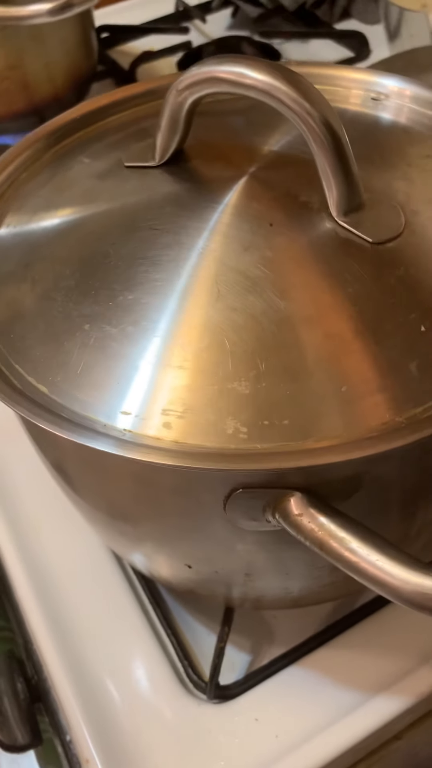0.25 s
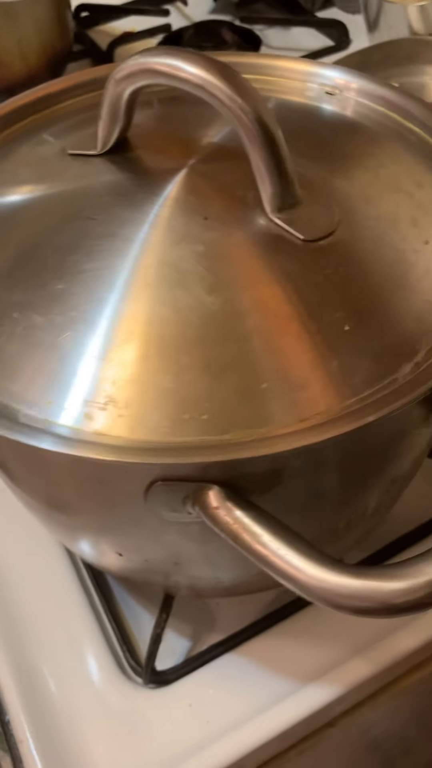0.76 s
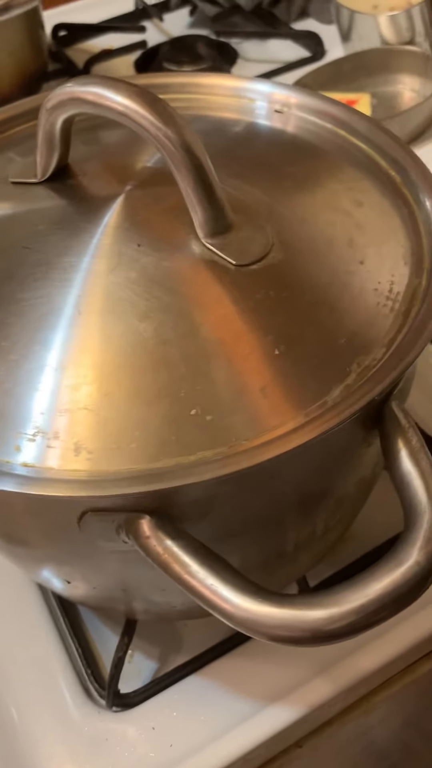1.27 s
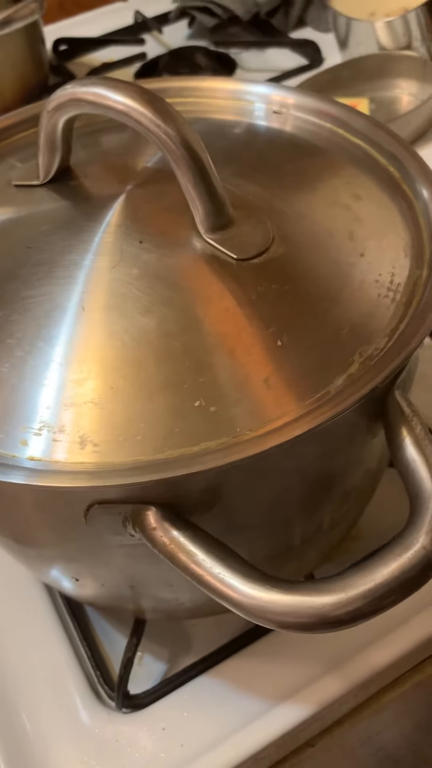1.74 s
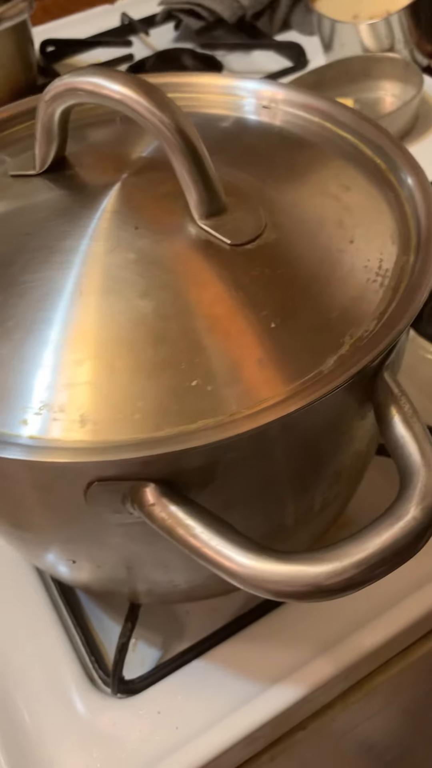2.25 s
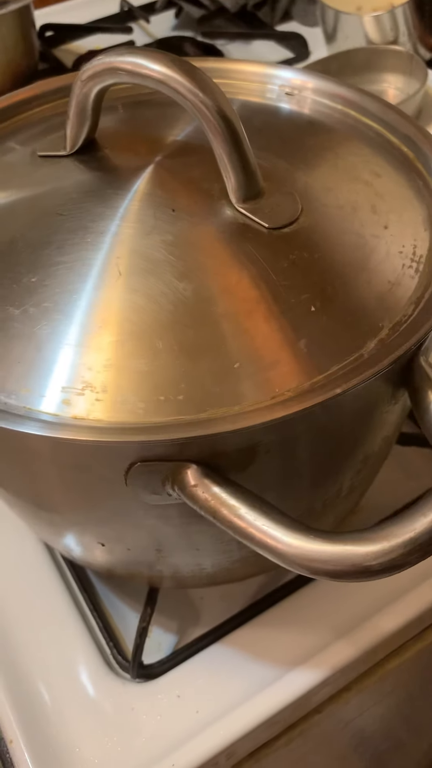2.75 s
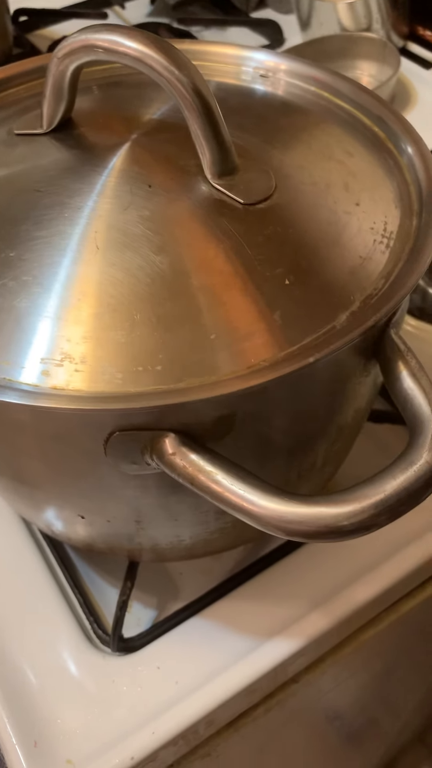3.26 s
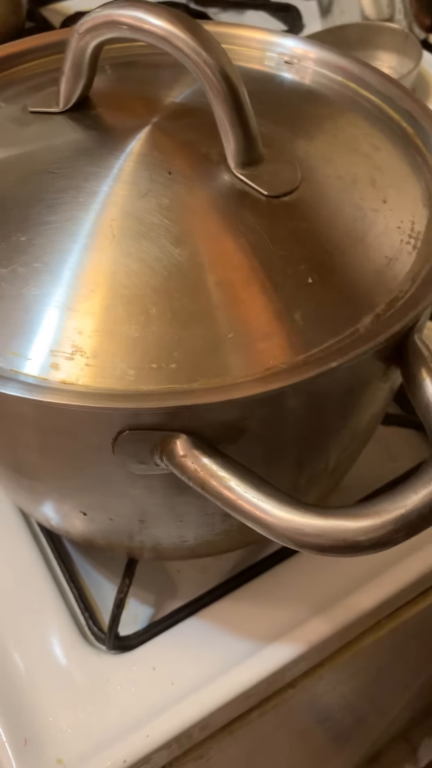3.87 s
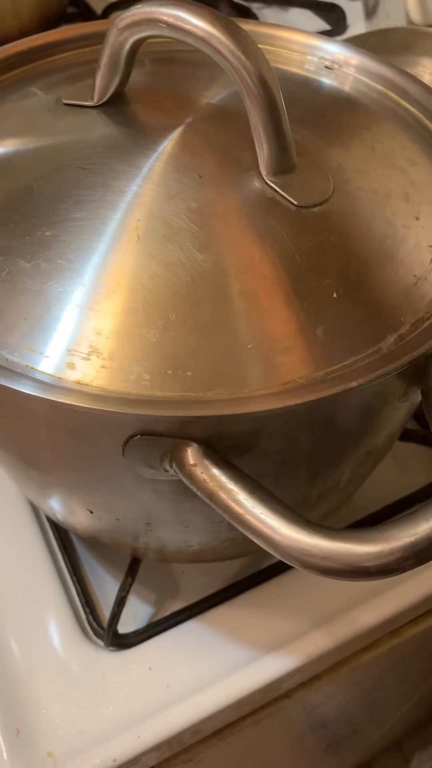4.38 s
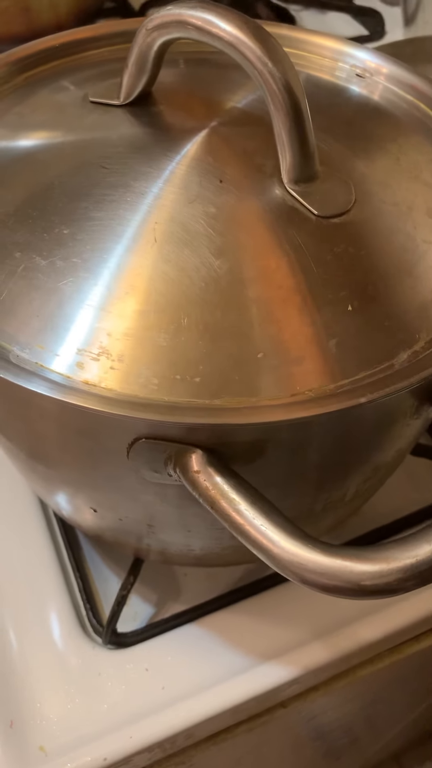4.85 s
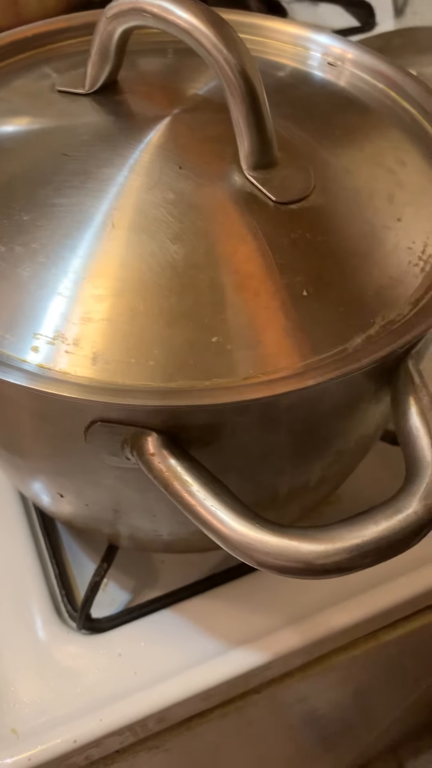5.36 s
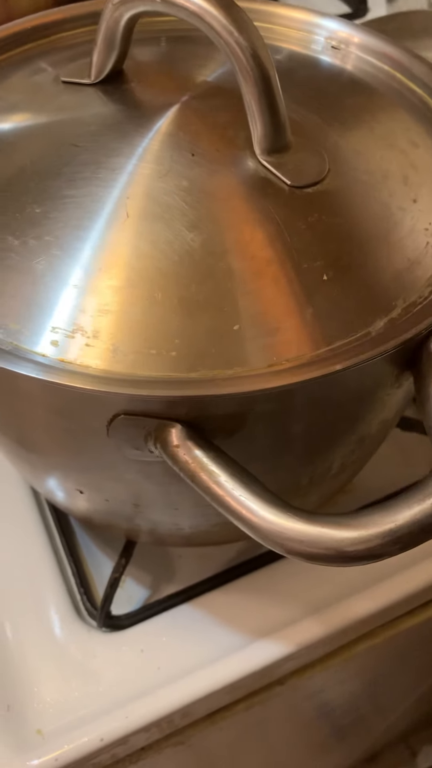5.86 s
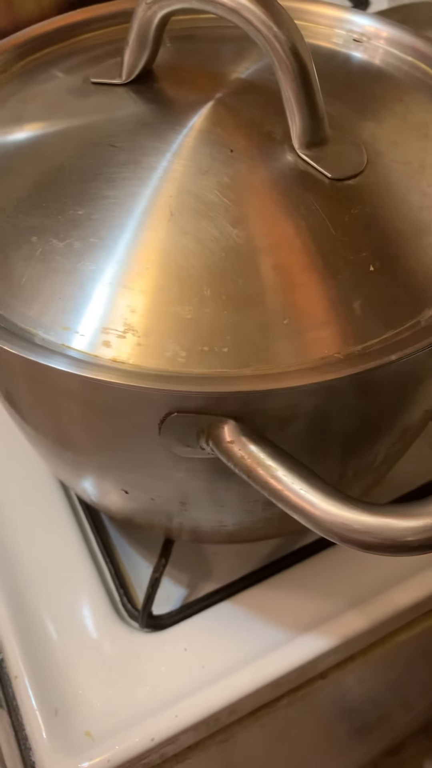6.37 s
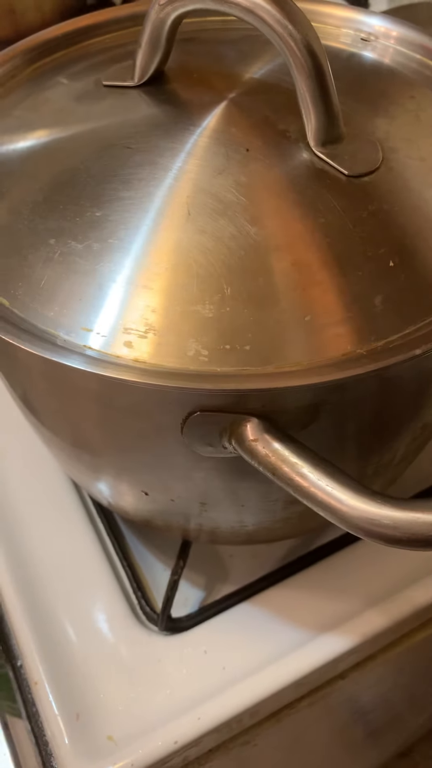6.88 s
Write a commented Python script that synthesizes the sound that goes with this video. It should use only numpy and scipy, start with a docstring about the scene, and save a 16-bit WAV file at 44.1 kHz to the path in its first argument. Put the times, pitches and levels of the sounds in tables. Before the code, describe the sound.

Steady gas hiss and fine bubbling fizz over a low fan hum, with a weighty set-down near the start and a sharp cookware clank later.

```python
"""A covered steel stockpot boils on a gas burner in a small kitchen, heard from just above the lid.
Throughout, banded noise makes the flame hiss, tiny decaying sines fizz as bubbles and a fan hums.
A load shifts with soft noise rumbles; something heavy is then set down with a few dull thuds, and a
utensil knocks lightly. Late on, a piece of cookware clanks over a short low boom of the hob panel.
Struck things are bursts of noise for their crowded modes, with decaying sines for the clear ones."""
import sys
import numpy as np
from scipy import signal
from scipy.fft import rfft, irfft
from scipy.io import wavfile

SR = 44100
rng = np.random.default_rng(int(sys.argv[2]) if len(sys.argv) > 2 else 0)


def file_out(sig):
    """Save sig as 16-bit WAV at sys.argv[1]."""
    # one column per channel
    cols = np.atleast_2d(sig).T
    # limit, then scale
    lim = np.clip(cols, -1, 1)
    pcm = np.round(lim * 32767).astype(np.int16)
    wavfile.write(sys.argv[1], SR, pcm)


N = 313992
TIME = np.arange(N) / SR  # s
FREQ = np.maximum(np.arange(N // 2 + 1) * SR / N, 1)  # Hz, kept above 0 for logarithms

# burner hiss: (frequency [Hz], density [dB per Hz])
HISS_SPECTRUM = [(150, -113), (500, -91.5), (1000, -80.3), (1800, -80.8), (2900, -79.8), (4200, -80.3),
                 (5700, -82), (6700, -84), (7500, -83), (8400, -81.5), (9900, -83), (11200, -87),
                 (12500, -88), (13800, -90.3), (15500, -90.5)]
# slow course of the hiss that flame and boil share; only its swing counts: (time [s], level [dB])
HISS_LEVEL_COURSE = [(0.0, -46.5), (2.2, -47), (3.05, -48), (3.88, -47.5), (5.25, -46.5), (5.73, -48),
                     (6.2, -46.5), (7.12, -46.5)]
# reflections off the hob and the wall behind it: (delay [ms], level [dB])
HOB_BOUNCES = [(1.7, -16.5), (3.4, -16), (5.6, -8.5), (8.3, -18.5)]

# air rushing through the fan: (frequency [Hz], density [dB per Hz])
FAN_AIR_SPECTRUM = [(22, -98), (33, -80), (45, -72), (65, -76), (92, -71.5), (125, -66.5), (165, -81.5),
                    (240, -73), (330, -81), (480, -85), (650, -99), (1000, -83.5), (3000, -105)]
# duct resonances rung by the air: (frequency [Hz], width [Hz], peak density [dB per Hz])
DUCT_RESONANCES = [(402.3, 17, -65.5), (543.8, 9.8, -69.5), (688.4, 21.5, -73), (816, 19.3, -71.5)]
# tones of the three-bladed fan: (multiple of the shaft rate, level [dB])
FAN_TONES = [(2, -78), (3, -53.5), (6, -57.5), (12, -57)]

# soft shifts of the load: (time [s], length [s], level before colouring [dB])
LOAD_SHIFTS = [(0.567, 0.051, -67), (1.163, 0.092, -69), (4.852, 0.087, -63.5)]
# colour of their rumble: (frequency [Hz], gain [dB])
LOAD_SHIFT_COLOUR = [(60, -20), (130, -3), (240, 6), (340, -1.5), (500, -14), (1500, -45)]

# heavy thing set down: (time [s], level [dB], contact [ms])
THUD_BLOWS = [(0.8586, 0.5, 0.031), (.8865, -15, .41), (0.9229, -9.5, 0.15), (0.9506, -13.5, 0.67),
              (1.0843, -4.5, 0.81)]
# broad tones of the flexing worktop: (frequency [Hz], level [dB], rise before contact slows it [ms])
WORKTOP_TONES = [(185, -25.5, 30), (229, -15.3, 21.7), (273, -7.5, 9.7), (348, -15.5, 16),
                 (409.7, -20.5, 25), (540, -20, 11.3), (660, -29, 8)]
# ring of a pan on the worktop: (frequency [Hz], level [dB], t60 [s])
PAN_RING = [(856, -23.5, 0.65), (1555, -34, 0.34), (1640, -42, .2), (1760, -42, .15)]
# colour of the thuds' crowd of short-lived modes: (frequency [Hz], relative level [dB])
THUD_COLOUR = [(100, -2), (165, 5), (240, -5), (380, 14), (650, 9), (1100, -6.5), (1700, -5), (2200, -18),
               (3000, -14), (4500, -17), (5800, -3), (7500, -16.5), (10000, -15)]

# light knocks of a utensil: (time [s], level [dB], contact [ms])
KNOCK_BLOWS = [(1.044, -3.5, 0.021), (1.057, -0.5, 0.023), (1.428, 2, .012), (1.434, 5, 0.025),
               (1.441, 0, 0.044), (1.449, 1.5, .1), (1.474, -4, .05)]
# ring of the utensil: (frequency [Hz], level [dB], t60 [s])
UTENSIL_RING = [(245.5, -36.5, 0.09), (954, -46, 0.11), (1180, -46, .1), (1270, -44, 0.11), (1355, -47, .1),
                (1545, -44, 0.22), (1605, -44.5, 0.13), (1785, -42, .09), (2050, -49, .08),
                (2410, -45.5, .07), (3350, -49, .06)]
# colour of its crowd of short-lived modes: (frequency [Hz], relative level [dB])
KNOCK_COLOUR = [(150, 3), (330, 10), (700, -5), (1300, 3), (1850, 6), (2300, 1), (2800, -5), (3700, -3),
                (6000, -20), (10000, -14)]

# cookware lands and chatters: (time [s], level [dB], contact [ms])
CLANK_BLOWS = [(5.305, -16, .01), (5.308, -1.5, 0.0055), (5.3152, 3.5, 0.033), (5.3215, -4, 0.049),
               (5.347, -11, 0.04)]
# ring of the damped metal: (frequency [Hz], level [dB], t60 [s])
CLANK_RING = [(395, -42.5, 0.3), (873, -36, 0.078), (960, -22, 0.034), (1355, -21, 0.125),
              (1430, -35, 0.09), (1545, -34, 0.12), (1660, -33, .08), (2188, -20, 0.11), (2225, -20, 0.096),
              (2321, -23, 0.15), (2797, -28, 0.13), (2980, -34.5, 0.13), (3080, -36, .1), (3448, -39, 0.1),
              (3825, -27, 0.09), (3950, -20, 0.075), (5780, -21, 0.038)]
# colour of its crowd of short-lived modes: (frequency [Hz], relative level [dB])
CLANK_COLOUR = [(100, -13), (400, 2), (700, -8), (1150, -9), (1400, 5), (1850, -6), (2300, 3), (3000, 6),
                (3800, 8), (5000, -11), (7000, -11), (10000, -21), (15000, -25)]

# the two microphone ports:
# (frequency [Hz], phase by which the left leads [rad], likeness [0-1], left minus right [dB])
MIC_PORTS = [(50, 0, 1, .4), (130, 0, .995, 1.2), (280, 0, .92, 3.2), (550, 0, .6, 1.5), (800, 0, .1, 1.5),
             (1400, 0, .45, 1), (2300, 1, .4, -.3), (3300, 1.7, .55, 0), (4700, 3.14, .9, 0)]


def undb(db):
    """Decibels to gain."""
    return 10 ** (np.asarray(db) / 20)


def shape(points):
    """Gain at every frequency from (Hz, dB) points, joined along a logarithmic pitch axis."""
    hz, db = np.transpose(points)
    return undb(np.interp(np.log(FREQ), np.log(hz), db))


def noise(gain):
    """Noise whose density per Hz follows the gain."""
    return irfft(rfft(rng.standard_normal(N)) * gain, N) * np.sqrt(SR / 2)


def walk(rate):
    """Continuous random wander with a spread near 1, changing about rate times a second."""
    steps = rng.standard_normal(8000)
    return 1.19 * np.interp(TIME * 2 * rate, np.arange(len(steps)), steps)


def fade(t60, t):
    """Exponential decay that loses 60 dB in t60 seconds."""
    return np.exp(-np.log(1000) * t / t60)


def ports(near, stray, lag_s=0.000236):
    """Both ports share the near sound, a little apart in time; stray reflections reach them unalike."""
    hz, *columns = np.transpose(MIC_PORTS)
    lead, alike, tilt_db = (np.interp(FREQ, hz, column) for column in columns)
    # in the treble, above the last row, the right port lags further by a constant time
    lead = lead + 2 * np.pi * lag_s * np.maximum(FREQ - hz[-1], 0)
    sides = np.array([[1], [-1]])  # left, right
    shared = rfft(near) * np.sqrt((1 + alike) / 2)
    unlike = sides * rfft(stray) * np.sqrt((1 - alike) / 2)
    return irfft((shared + unlike) * undb(sides * tilt_db / 2) * np.exp(0.5j * sides * lead), N)


def heat(depth=0.97):
    """Slow swell of the flame and the boil about their usual level, in dB."""
    db = np.interp(TIME, *np.transpose(HISS_LEVEL_COURSE))
    return depth * (db - np.mean(db))


def bounced(x, sway_ms=0.11, sway_hz=0.9):
    """Close reflections comb the hiss; the teeth slide as the hand that holds the microphone sways."""
    out, power = x.copy(), 1
    for delay_ms, db in HOB_BOUNCES:
        delay_s = (delay_ms + sway_ms * walk(sway_hz)) / 1000
        source = np.rint((TIME - delay_s) * SR).astype(int)
        out += undb(db) * np.take(x, source, mode="wrap")
        power += undb(db) ** 2
    return out / np.sqrt(power)


def burner(flutter_db=0.6, flicker_db=1.34, flicker_hz=24, swell=0.96):
    """Gas jets hiss: the whole flame flutters a little and each band flickers on its own."""
    edges_hz = [0, 1700, 2700, 4200, 5700, 7500, 9500, 12000, SR / 2]
    colour = shape(HISS_SPECTRUM)
    flutter = flutter_db * walk(5.6)
    air = np.array([rfft(noise(colour)) for _ in range(2)])
    # the low roar starts 3.5 dB louder and settles steadily over 4 s
    roar = 3.5 * np.maximum(1 - TIME / 4, 0)
    out = 0
    for low, high in zip(edges_hz, edges_hz[1:]):
        drift = roar if low == 0 else swell * heat()
        band = irfft(air * ((FREQ >= low) & (FREQ < high)), N)
        out = out + band * undb(drift + flutter + flicker_db * walk(flicker_hz))
    near, stray = out
    return ports(bounced(near), bounced(stray))


def fizz(db=-56, spread_db=4.0, cycles=14, low_hz=1100, high_hz=11000, count=1800):
    """Tiny steam bubbles collapse on the hot pot floor, each a few cycles of ring; few are large."""
    t = np.arange(512) / SR
    out = np.zeros((2, N + len(t)))
    for k, (when, pitch, luck) in enumerate(rng.random((count, 3))):
        hz = low_hz * (high_hz / low_hz) ** pitch
        size = undb(db - spread_db * np.log(max(luck, 0.004)))  # the floor caps the largest
        start = int(when * N)
        ring = np.sin(2 * np.pi * hz * t) * fade(cycles / hz, t)
        out[k % 2, start:start + len(t)] += size * ring  # near and stray in turn
    return ports(*out[:, :N] * undb(heat()))


def drone_level(db=-55, db_per_s=0.17, swell_db=7.5, waver_db=0.5, waver_hz=2.9):
    """Level of the shaft drone in dB: it grows slowly, wavers while weak and steadies in one swell."""
    start_s, rise_s, end_s, fall_s = 1.3, 0.85, 4.5, 0.25
    rise, fall = (TIME - start_s) / rise_s, (end_s - TIME) / fall_s
    swell = np.clip(np.minimum(rise, fall), 0, 1)
    return db + db_per_s * TIME + swell_db * swell + waver_db * (1 - swell) * walk(waver_hz)


def fan(shaft_hz=45.55, wobble=0.0015, waver_db=0.5, hum_hz=120.0, hum_db=-42.2):
    """Mains hum, a shaft drone and tones at multiples of its rate, over air that rings the duct."""
    turn = 2 * np.pi * np.cumsum(shaft_hz * (1 + wobble * walk(1.89))) / SR
    tones = undb(drone_level()) * np.sin(turn)
    tones += undb(hum_db + 0.5 * walk(10.0)) * np.sin(2 * np.pi * hum_hz * TIME)
    for multiple, db in FAN_TONES:
        tones += undb(db + waver_db * walk(1.56)) * np.sin(round(multiple) * turn)
    power = shape(FAN_AIR_SPECTRUM) ** 2
    for hz, width, db in DUCT_RESONANCES:
        detune = (FREQ / hz - hz / FREQ) * hz / width
        power = power + undb(db) ** 2 / (1 + detune ** 2)
    air, stray_air = (noise(np.sqrt(power)) for _ in range(2))
    return ports(np.sqrt(2) * tones + air, stray_air)  # root 2: tone levels are RMS


def shifts():
    """Soft, unpitched rumbles as the load shifts on the worktop: each swells and fades."""
    level = 0
    for when, length, db in LOAD_SHIFTS:
        progress = np.clip((TIME - when) / length, 0, 1)
        level = level + undb(db) * np.sin(np.pi * progress)
    near, stray = (level * noise(shape(LOAD_SHIFT_COLOUR)) for _ in range(2))
    return ports(near, stray)


def kitchen(x, t60=0.28, gap=0.0031):
    """Reflections from close walls and cupboards; as strong as the sound that goes in."""
    t = TIME[:SR // 2]
    tail = rng.standard_normal(len(t)) * fade(t60, t) * (t > gap)
    return signal.fftconvolve(x, tail / np.linalg.norm(tail))[:N]


def soften(hz, contact):
    """A contact that lasts this many seconds passes little of the high frequencies."""
    return 1 / (1 + (2 * np.pi * hz * contact) ** 2)


def flex(build_up=3, room_db=-17):
    """Each thud flexes the worktop: broad low tones swell at their own pace, beat and die quickly."""
    t = TIME[:SR // 2]
    hz, tone_db, rise_ms = np.transpose(WORKTOP_TONES)[:, :, None]
    out = np.zeros(N + SR)
    for when, db, contact_ms in THUD_BLOWS:
        contact = contact_ms / 1000
        age = t / (rise_ms / 1000 + build_up * contact)  # 1 at the peak
        swell = undb(db + tone_db) * soften(hz, contact) * (age * np.exp(1 - age)) ** 2
        start = int(when * SR)
        out[start:start + len(t)] += np.sum(swell * np.sin(2 * np.pi * hz * t), axis=0)
    near = out[:N]
    return ports(near + undb(room_db) * kitchen(near), undb(room_db + 7) * kitchen(near))


def struck(blows, modes, body, body_db, body_t60, chatter_db, crack_db, rise_s, room_db=-12,
           ring_rise_s=0.0025, build_up=3, chatter_hz=170, grain_db=2.5, grain_hz=300, crack_t60=0.024):
    """Blows crack and stir a grainy crowd of modes, then clear ones; long contact dulls and swells."""
    t = TIME[:SR]
    hz, mode_db, t60 = np.transpose(modes)[:, :, None]
    crowd_hz = np.arange(SR // 2 + 1)
    colour = np.interp(crowd_hz, FREQ, shape(body))
    colour = colour / np.sqrt(np.mean(colour ** 2))
    energy, out = np.zeros((len(modes), N + SR)), np.zeros((2, N + SR))
    ring = undb(mode_db) * fade(t60, t) * (1 - np.exp(-t / ring_rise_s))
    for when, db, contact_ms in blows:
        contact = contact_ms / 1000
        start = int(when * SR)
        span = slice(start, start + SR)
        swell = undb(db) * (1 - np.exp(-t / (build_up * contact + rise_s)))
        energy[:, span] += (swell * ring * soften(hz, contact)) ** 2
        push = rfft(rng.standard_normal((2, SR))) * soften(crowd_hz, contact)
        out[:, span] += undb(body_db) * swell * fade(body_t60, t) * irfft(push * colour, SR)
        out[:, span] += undb(db + crack_db) * fade(crack_t60, t) * irfft(push, SR)
    out[:, :N] *= undb(grain_db * walk(grain_hz))
    # the modes swing out of step with each other, and loose contact makes each one chatter
    chatter = undb(chatter_db * np.array([walk(chatter_hz) for _ in modes]))
    stagger = np.arange(len(modes))[:, None] ** 2
    live = np.flatnonzero(energy[0, :N])
    loudest = max(blows, key=lambda blow: blow[1])
    swing = np.sin(2 * np.pi * hz * (TIME[live] - loudest[0]) + stagger)
    out[0, live] += np.sum(np.sqrt(energy[:, live]) * chatter[:, live] * swing, axis=0)
    near, stray = out[:, :N]
    return ports(near + undb(room_db) * kitchen(near), stray + undb(room_db + 0.5) * kitchen(near))


def thuds():
    """The heavy thing stirs a long, swelling crowd of modes and rings a pan on the worktop."""
    return struck(THUD_BLOWS, PAN_RING, THUD_COLOUR, body_db=-18.5, body_t60=0.25,
                  chatter_db=0.5, crack_db=-50, rise_s=0.0094)


def knocks():
    """The utensil's light, short blows leave a brief ring that chatters strongly."""
    return struck(KNOCK_BLOWS, UTENSIL_RING, KNOCK_COLOUR, body_db=-33.0, body_t60=0.062,
                  chatter_db=4.5, crack_db=-47, rise_s=0.00055)


def clank():
    """Landing cookware cracks sharply and its damped metal rings as it chatters."""
    return struck(CLANK_BLOWS, CLANK_RING, CLANK_COLOUR, body_db=-21.0, body_t60=0.15,
                  chatter_db=2.5, crack_db=-29, rise_s=0.00046)


def boom(when=5.325, hz=112, db=-28, rise_s=0.027):
    """Under the landing cookware the hob panel swells into a short low boom."""
    age = np.maximum(TIME - when, 0) / rise_s  # 1 at the peak
    return undb(db) * age ** 2 * np.exp(1 - age ** 2) * np.sin(2 * np.pi * hz * (TIME - when))


def scene():
    """The steady stove and fan, with the handling of cookware close by."""
    stove = burner() + fizz() + fan()
    handling = shifts() + flex() + thuds() + knocks() + clank() + boom()
    return stove + handling


def record(dry, top_hz=15650):
    """The recorder cuts off the highest treble with a steep low-pass."""
    return signal.sosfilt(signal.ellip(10, 0.1, 80, top_hz, fs=SR, output="sos"), dry)


dry = scene()
out = record(dry)
file_out(out)
```